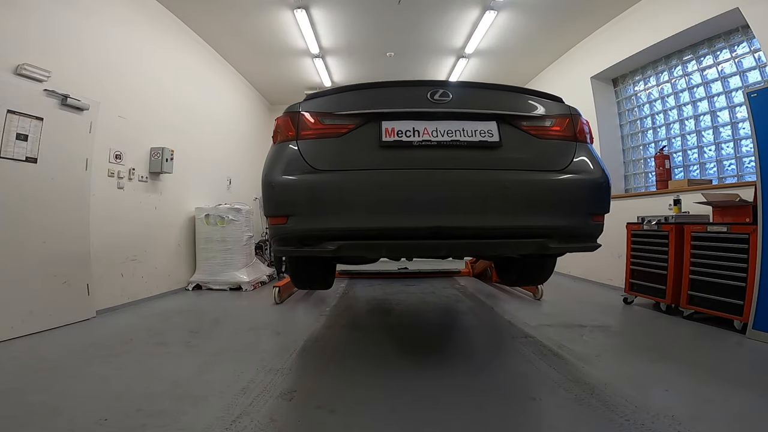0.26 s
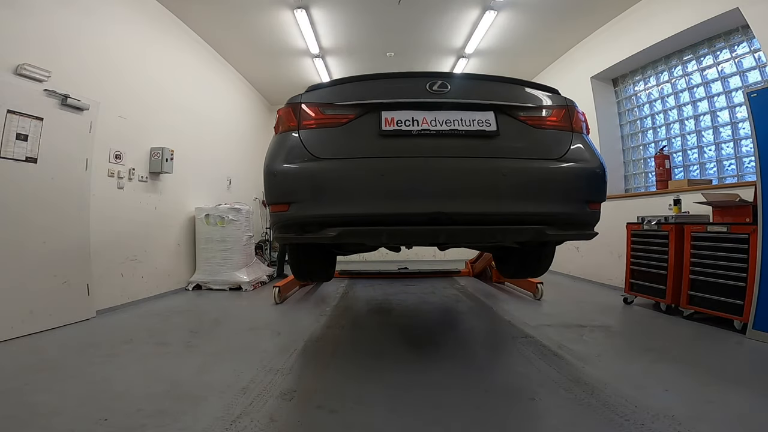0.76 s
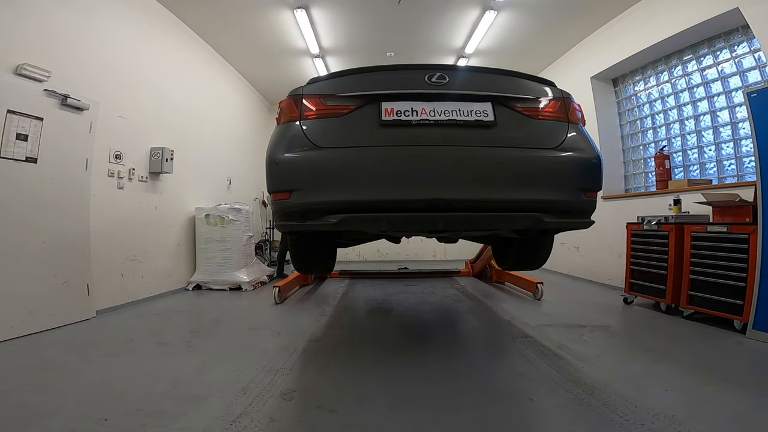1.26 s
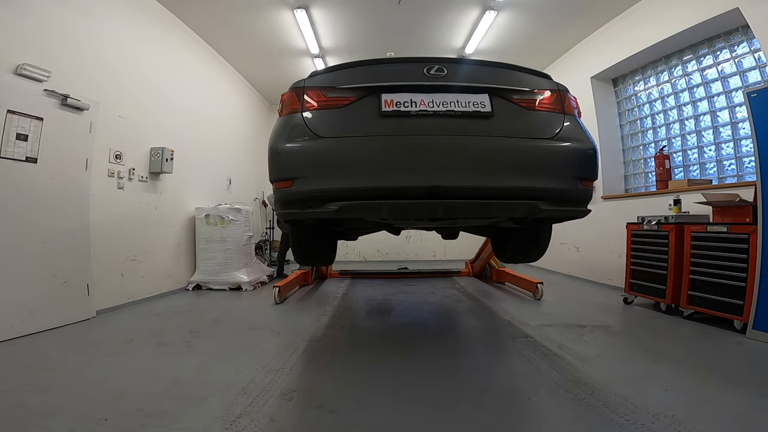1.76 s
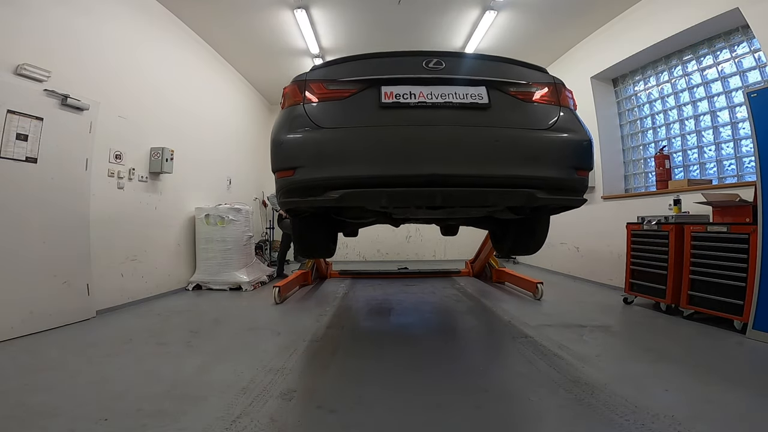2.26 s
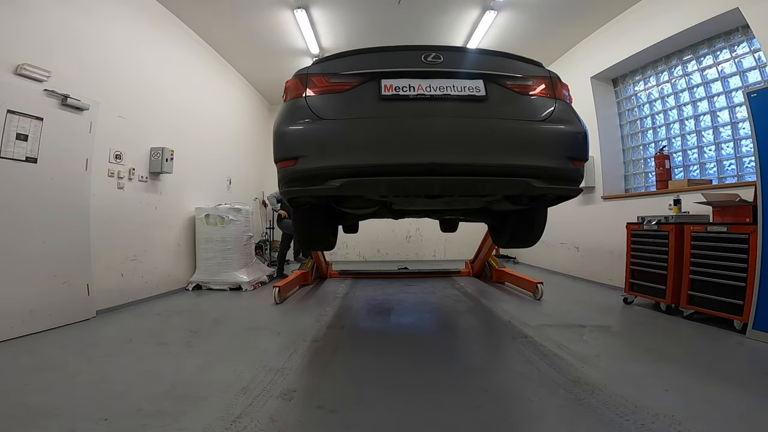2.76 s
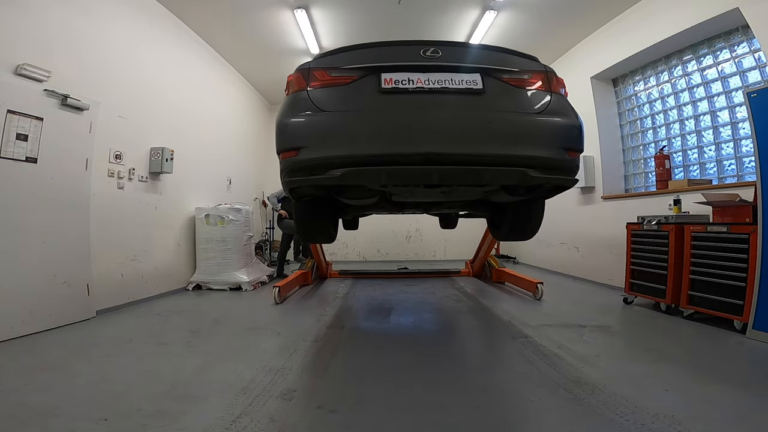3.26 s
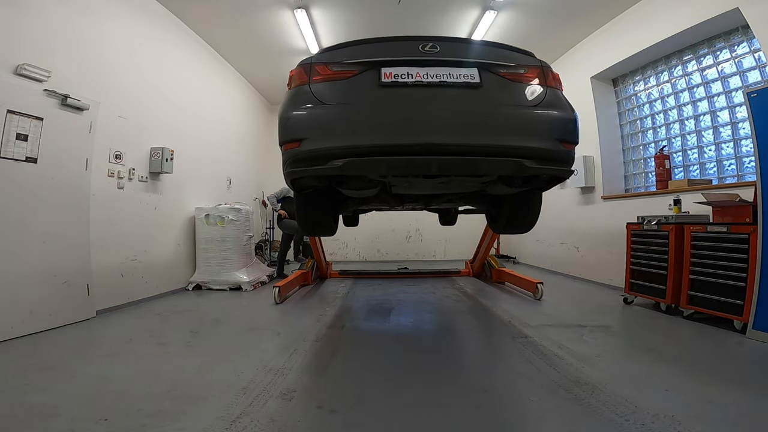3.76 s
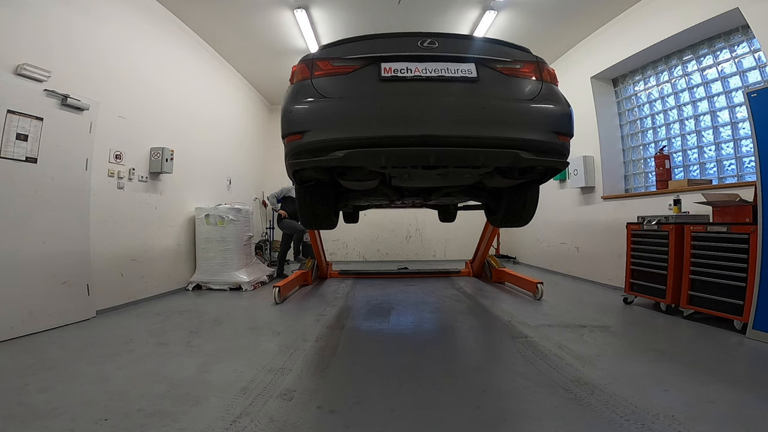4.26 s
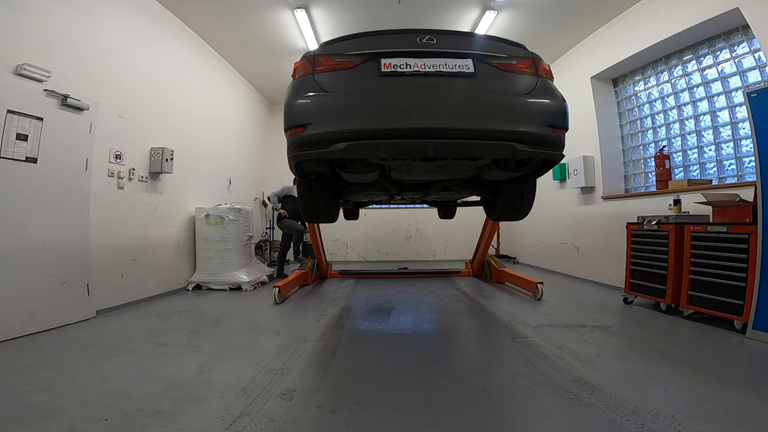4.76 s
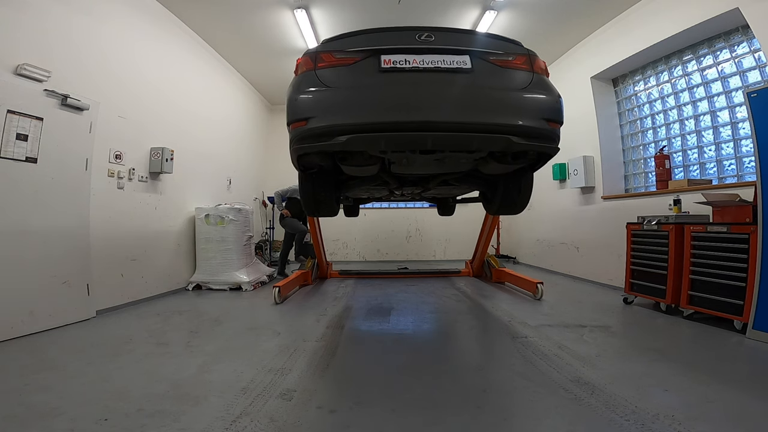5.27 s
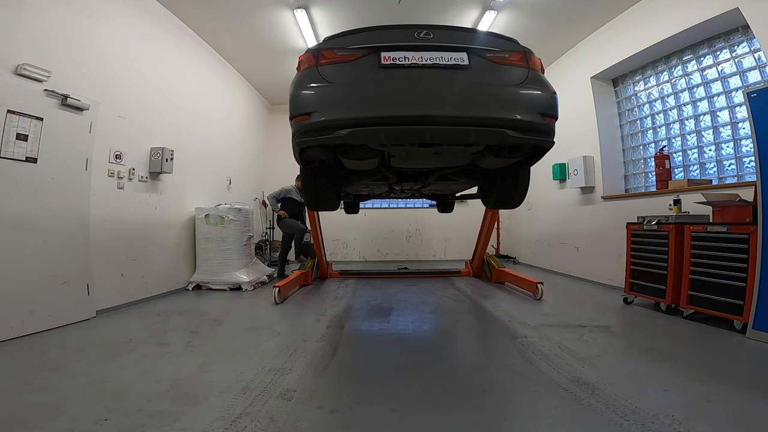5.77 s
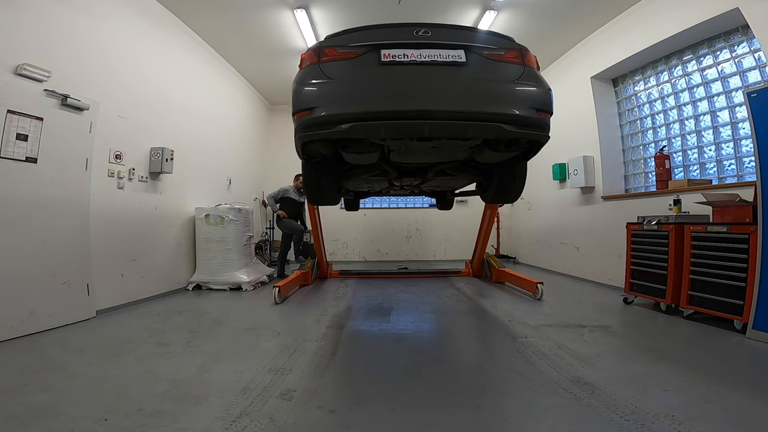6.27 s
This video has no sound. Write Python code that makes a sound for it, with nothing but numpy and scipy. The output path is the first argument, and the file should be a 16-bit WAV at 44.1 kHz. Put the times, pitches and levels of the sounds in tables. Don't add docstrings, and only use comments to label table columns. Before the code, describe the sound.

A hydraulic car lift whines and hums steadily in a small bare workshop while its safety latch clacks loudly about once a second.

```python
import sys
import numpy as np
from scipy import signal
from scipy.fft import rfft, irfft
from scipy.io import wavfile
from scipy.ndimage import uniform_filter1d

SR = 44100
rng = np.random.default_rng(int(sys.argv[2]) if len(sys.argv) > 2 else 0)


def int16_out(signal):
    q = np.round(np.clip(np.atleast_2d(signal).T, -1, 1) * 32767)
    wavfile.write(sys.argv[1], SR, q.astype(np.int16))


def boost_factor(decibels):
    exponent = np.asarray(decibels, float) / 20
    return 10 ** exponent


N = 287868
SHAFT_HZ = 94.443

# frequency in Hz, level in dB per Hz.
RUSH_COLOUR = [(20, -48), (100, -1.5), (200, -25), (350, -8), (600, -8), (1000, -8.5), (1600, -6.5),
               (2300, -7.5), (3000, -9.5), (3800, -17), (6000, -14.5), (8000, -18.5), (11000, -30),
               (16000, -31)]


def pump(others_db=1.5, flutter_db=0.6, high_flutter_db=2.0, unsteady=0.00015):
    # multiple of the shaft speed, level in
    # dB rms.
    plain_tones = [(17, -49.9), (47, -58.2), (54, -56.2), (56, -59.3), (57, -59.4), (63, -53.7),
                   (64, -54.9), (66, -56.0), (68, -59.8), (82, -54.1), (96, -54.5), (108, -57.3),
                   (118, -71.8), (120, -60.8), (132, -61.1), (134, -66.2), (139, -64.7),
                   (143, -57.5), (146, -64.9), (148, -70), (149, -63.2), (151, -69), (153, -71.7),
                 (155, -66.2), (156, -65.7), (157, -67.1), (162, -66.3),
                   (4, -56), (14, -49.5), (16, -51), (46, -52.5), (49, -53.5), (50, -86), (122, -65)]
    # multiple of the shaft speed, level
    # in dB rms.
    echoing_tones = [(12, -33.8), (60, -34.1), (62, -40.3), (48, -39.0), (58, -43.7), (72, -42.8), (24, -42.6),
                     (10, -46.4), (36, -49.1), (84, -52.0),
                     (70, -46.0), (74, -45.4), (22.24, -42.4), (18, -40.5), (145, -48.4), (144, -60.8),
                  (59, -45.4), (61, -49.6)]
    wander_db, echoing_db = 2.2, 0.1
    echoing_flutter_share = 0.95

    t = np.arange(N) / SR
    others = plain_tones
    slow_t, wander = drift(4.3, count=len(others))
    tones = []  # multiple, level curve in dB, share of the flutter
    for (order, db), curve in zip(others, wander):
        tones.append((order, db + others_db + wander_db * curve, 1))
    for order, db in echoing_tones:
        beat_db = 20 * np.log10(abs(paths(order, slow_t)) + 0.03)
        tones.append((order, db + echoing_db + beat_db, echoing_flutter_share))

    flutter = drift(30, count=len(tones) + 1)[1]
    speed_wobble = 1 + unsteady * np.interp(t, slow_t, flutter[-1])
    turns = np.cumsum(shaft_hz(t) * speed_wobble) / SR
    whine = np.zeros(N)
    for (order, db, share), curve, start in zip(tones, flutter, rng.random(len(tones))):
        db = db + share * (flutter_db + high_flutter_db * order / 100) * curve
        echo_phase = np.unwrap(np.angle(paths(order, slow_t)))
        phase = 2 * np.pi * (order * turns + start) + np.interp(t, slow_t, echo_phase)
        whine += np.interp(t, slow_t, boost_factor(db)) * np.sin(phase)
    return np.sqrt(2) * whine


def shaft_hz(t):
    return SHAFT_HZ + 0.0999 * t + 0.00425 * t ** 2


def paths(order, t):
    # multiple of the shaft speed, echo level in dB,
    # beats per second, time in step in seconds.
    car_echoes = [(12, -0.5, -0.287, 1.65), (12, -13.7, 0.622, 3.74), (12, -1.6, -0.238, 3.5),
                  (60, -5.0, 0.346, 1.63), (60, -8.1, 1.054, 3.33), (60, -10.6, -0.55, 2.22),
                  (62, -1.9, 1.1, 3.16), (62, -4.4, -0.122, 1.79), (62, -0.5, 0.588, 2.94),
                  (48, -13.3, 1.693, 2.84), (48, -6.1, -0.058, 10.19), (48, -6.2, 0.395, 2.71),
                  (58, -1.9, 1.374, 3.16), (58, -6.5, -1.316, 2.73), (58, -4.4, 0.177, 4.47),
                  (72, -16.2, -1.682, 3.23), (72, -9.7, -0.341, 2.94), (72, -15.6, 1.094, 2.79),
                  (24, -13.2, -1.037, 3.11), (24, -7.9, -0.717, 2.36), (24, -10.9, 0.64, 3.46),
                  (10, -5.3, 0.157, 1.28), (10, -12.1, 0.888, 3.03), (10, -8.8, -0.138, 2.26),
                  (36, -4.6, -1.58, 2.73), (36, -4.7, 0.717, 3.08), (36, -4.2, 0.411, 1.8),
                  (84, -3.2, -0.591, 3.66), (84, -0.5, -0.351, 3.01), (84, -6.6, 0.939, 3.41),
                  (70, -1.6, -0.181, 1.33), (70, -10.5, 1.051, 3.01), (70, -4.6, -0.508, 3.37),
                   (74, -7.2, 1.11, 3.0), (74, -10.3, -0.737, 3.3), (74, -14.2, 0.242, 2.47),
                   (22.24, -13.0, -1.427, 2.94), (22.24, -7.2, 0.378, 3.99), (22.24, -4.8, -0.026, -11.21),
                   (18, -16.0, -0.826, 3.28), (18, -0.5, 0.051, 12.59), (18, -7.8, 0.132, 2.64),
                   (145, -19.7, 1.405, 3.09), (145, -4.5, -0.041, -8.39), (145, -17.8, -1.729, 3.19),
                   (144, -8.5, -1.798, 3.07), (144, -0.5, 0.387, 4.01), (144, -2.0, -0.832, 2.6),
                   (59, -4.9, -0.073, 9.59), (59, -12.3, 1.679, 2.8), (59, -17.6, -0.475, 4.01),
                   (61, -11.2, -0.743, 3.47), (61, -6.1, 1.057, 3.11), (61, -6.5, -0.164, 3.43)]
    total = 1 + 0 * t
    for echo_order, db, beat_hz, in_step_s in car_echoes:
        if echo_order == order:
            total = total + boost_factor(db) * np.exp(2j * np.pi * beat_hz * (t - in_step_s))
    return total


def shaft_buzz(level_db=-46, spread_db=5, swell_db=3):
    t = np.arange(N) / SR
    orders = np.arange(2049)
    slow_t, swell = drift(2.68, count=3)
    sizes_db = read(RUSH_COLOUR, orders * SHAFT_HZ) + spread_db * rng.standard_normal(len(orders))
    sizes = boost_factor(sizes_db) * (orders < 166)
    patterns = irfft(sizes * np.exp(2j * np.pi * rng.random((3, len(orders)))))
    place = np.cumsum(shaft_hz(t)) / SR % 1 * patterns.shape[1]
    buzz = np.zeros(N)
    for pattern, curve in zip(patterns, swell):
        repeated = np.interp(place, np.arange(len(pattern)), pattern, period=len(pattern))
        buzz += np.interp(t, slow_t, boost_factor(swell_db * curve)) * repeated
    return boost_factor(level_db) * evened(buzz)


def latch(strength_db=2):
    # time in seconds, level in dB rms, low thud in dB, arm ring in dB, brightness in dB.
    blows = [
        (0.2636, -9, -6, -3.5, 1),
        (1.218, -9.5, -10, -2.5, 0),
        (2.1577, -11.5, -10.5, -4.5, 2),
        (3.0768, -10.5, -9.5, -3, 1.5),
        (3.9755, -12, -17, -3, 2.5),
        (4.8423, -12, -20, -1.5, 2.5),
        (5.684, -12, -19, -0.5, -0.5),
        (6.4923, -16.5, -16, -13, 1.5),
    ]
    out = np.zeros(N + SR)
    for start_s, db, *colour in blows:
        start = round((start_s - 0.0022) * SR)
        out[start:][:SR] += boost_factor(db + strength_db) * clack(*colour)
    return out[:N]


def clack(thud_db, ring_db, bright_db, modes_db=-1.5, direct_db=-20):
    # frequency in Hz, level in dB per Hz.
    knock_colour = [(40, -50), (160, -53), (220, -11.5), (340, 6), (460, -5.5), (640, 6), (900, -2.5),
                    (1500, -7.5), (2200, -6.5), (3300, -9), (4500, -16), (5200, -20), (8500, -23.5),
                    (11000, -35.5), (13000, -42), (15900, -60)]
    # frequency in Hz, level in dB, time to fall 60 dB in s.
    steel_tones = [(239, -15, 0.65), (343, 14, 0.13), (561, 10, 0.037), (646.7, 3.5, 0.15),
                   (855, -8, 0.058), (1147.5, -1, 0.13), (1800, -13, 0.25), (2038, -14, 0.25),
                   (2340, 3.5, 0.032), (2795, 4, 0.022), (3227, -8.5, 0.11), (3495, -2.5, 0.061),
                   (4044, -7, 0.04), (4413, -4, 0.035)]
    t = np.arange(SR) / SR
    hz, db, t60 = np.transpose(steel_tones)
    db = db + thud_db * (hz < 450) + ring_db * ((hz > 450) & (hz < 1300))
    hz = hz * (1 + 0.01 * rng.standard_normal(len(hz)))
    fading = boost_factor(db[:, None] - 60 * t / t60[:, None])
    steel = (fading * np.sin(2 * np.pi * hz[:, None] * t)).sum(0)

    knock = coloured(tail(SR), knock_colour, bright_db)
    straight = boost_factor(direct_db) * (t == 0)
    rung = signal.fftconvolve(steel, straight + tail(SR))[:SR]
    blow = evened(evened(knock) + boost_factor(modes_db) * evened(rung))
    blow *= np.minimum(t / 0.0044, 1)
    blow *= 1 + 0.2 * np.exp(-t / 0.027)
    floor = boost_factor(-15) * np.sin(2 * np.pi * 74 * t) * np.exp(-((t - 0.15) / 0.054) ** 2)
    return floor + blow


def tail(size, bass_cycles=5, treble_s=0.00063, fade_db=45):
    # frequency in Hz, time to fall 60 dB in seconds.
    room_t60 = [(100, 0.23), (350, 0.3), (700, 0.45), (1200, 0.67), (2800, 0.8), (6000, 0.7), (12000, 0.54)]
    hz, t, bands = signal.stft(rng.standard_normal(size), SR, nperseg=256, noverlap=192)
    rise = (1 - np.exp(-t * np.maximum(hz, 150)[:, None] / bass_cycles)) ** 2
    rise *= 1 - (hz[:, None] > 5500) * np.exp(-t / 0.0061)
    fall = boost_factor(-60 * t / read(room_t60, hz)[:, None])
    echoes = signal.istft(bands * rise * fall, SR, nperseg=256, noverlap=192)[1][:size]
    seconds = np.arange(size) / SR
    echoes *= 1 - np.exp(-seconds / treble_s)
    echoes *= boost_factor(-fade_db * seconds ** 2)
    return echoes / np.linalg.norm(echoes)


def air_valve():
    # time in seconds, level in dB rms.
    puff_level = [
        (5.29, -58),
        (5.345, -30),
        (5.375, -27),
        (5.415, -26.5),
        (5.45, -56),
        (5.5, -75),
    ]
    # frequency in Hz, level in dB.
    puff_colour = [(200, -22), (800, -0.5), (1000, -10), (1210, 5), (1450, -4), (1900, -13), (2400, 2),
                   (2750, -3.5), (3100, -12), (3600, -6), (4200, -6), (9000, -9.5), (13000, -17),
                   (16000, -19)]
    t = np.arange(N) / SR
    hiss = evened(coloured(rng.standard_normal(N), puff_colour))
    return hiss * boost_factor(np.interp(t, *np.transpose(puff_level), left=-120, right=-120))


def steel_groan():
    # time in seconds, pitch in Hz, peak level in dB.
    groan_path = [
        (0.979, 560, -75),
        (1.019, 510, -37.5),
        (1.06, 400, -45),
        (1.12, 296, -54),
        (1.16, 290, -75),
    ]
    t = np.arange(N) / SR
    s, hz, db = np.transpose(groan_path)
    phase = 2 * np.pi * np.cumsum(np.interp(t, s, hz)) / SR
    return boost_factor(np.interp(t, s, db, left=-120, right=-120)) * np.sin(phase)


def with_echoes(x):
    return x + signal.fftconvolve(x, tail(SR))[:N]


def motor_hum():
    # time in seconds, level in dB rms.
    hum_level = [(0, -40), (.75, -36.5), (1.7, -40), (2.6, -37.5), (3.55, -38.5), (3.85, -39), (4.45, -37),
                 (4.72, -35), (5.3, -37), (5.4, -48.5), (6.1, -50), (6.5, -41)]
    # frequency in Hz, level in dB rms.
    coil_tones = [(1400, -57.5), (1501, -60.5), (2304, -48)]
    t = np.arange(N) / SR
    hum = boost_factor(np.interp(t, *np.transpose(hum_level))) * np.sin(2 * np.pi * 600.6 * t)
    slow_t, wander = drift(5, count=len(coil_tones))
    for (hz, db), curve in zip(coil_tones, wander):
        hum += np.interp(t, slow_t, boost_factor(db + 3.0 * curve)) * np.sin(2 * np.pi * hz * t)
    return np.sqrt(2) * hum


def oil_rush(level_db=-37.5):
    t = np.arange(N) / SR
    slow_t, wander = drift(5, count=1)
    rush = evened(coloured(rng.standard_normal(N), RUSH_COLOUR))
    rush *= np.interp(t, slow_t, boost_factor(level_db + 0.27 * wander[0]))
    turns = np.cumsum(shaft_hz(t)) / SR
    return rush * (1 + 0.35 * np.cos(2 * np.pi * 2 * turns))


def drift(rate_hz, count):
    t = np.arange(N // 441 + 2) / 100
    hz = np.geomspace(rate_hz / 12, rate_hz, num=16)
    starts = rng.random((count, len(hz), 1))
    waves = np.sin(2 * np.pi * (hz[:, None] * t + starts)) / np.sqrt(hz)[:, None]
    return t, waves.sum(1) / np.sqrt(np.sum(0.5 / hz))


def evened(x):
    return x / np.sqrt(np.mean(abs(x) ** 2) + 1e-20)


def read(points, hz):
    f, value = np.transpose(points)
    return np.interp(np.log(hz + 1), np.log(f + 1), value)


def coloured(x, points, tilt_db=0):
    hz = np.fft.rfftfreq(len(x), 1 / SR)
    gain_db = read(points, hz) + tilt_db * np.log2(np.maximum(hz / 2000, 1))
    return irfft(rfft(x) * boost_factor(gain_db), len(x))


def scene():
    machine = pump() + shaft_buzz() + motor_hum() + oil_rush()
    return (machine + latch() + with_echoes(air_valve() + steel_groan()))[None]


def band_limit(x):
    return signal.sosfilt(signal.butter(12, 16010, fs=SR, output="sos"), x)


def record(dry):
    power_db = 10 * np.log10(abs(uniform_filter1d(dry[0] ** 2, size=331, origin=60)) + 1e-12)
    cut_db = 0
    for share, knee_db, release_s, left_db in ((0.48, -27.0, 0.49, 3.0), (0.38, -12, 0.073, 0.1)):
        cut = np.maximum(share * (power_db - knee_db), 1e-3)
        cut[0] = left_db
        release = np.arange(N) / SR / release_s
        cut_db = cut_db + np.exp(np.maximum.accumulate(np.log(cut) + release) - release)
    held = dry / boost_factor(uniform_filter1d(cut_db, size=221))

    bass_cut = signal.butter(6, 200, "high", fs=SR, output="sos")
    thin = signal.sosfilt(bass_cut, held) + boost_factor(-33) * held
    thin = 0.73 * np.tanh(thin / 0.66) + 0.005 * thin ** 2
    thin = signal.sosfilt(signal.butter(1, 90, "high", fs=SR, output="sos"), thin)

    rumble = signal.sosfilt(signal.butter(2, 150, fs=SR, output="sos"), rng.standard_normal(N))
    heard = thin + boost_factor(-76.5 - cut_db) * evened(rumble)
    treble_cut = signal.firwin(1023, 15700, window=("kaiser", 9), fs=SR)
    heard = signal.oaconvolve(heard, treble_cut[None], "same")
    return band_limit(heard)


dry = scene()
out = record(dry)
int16_out(out)
```